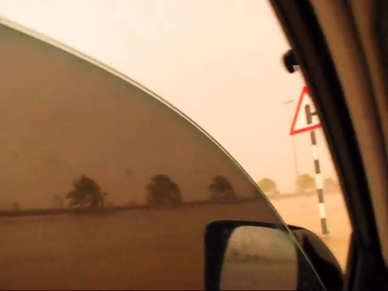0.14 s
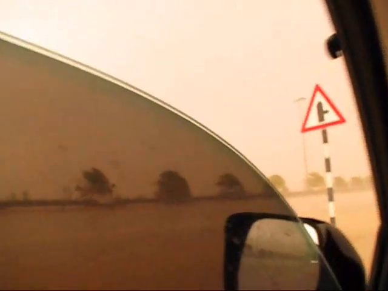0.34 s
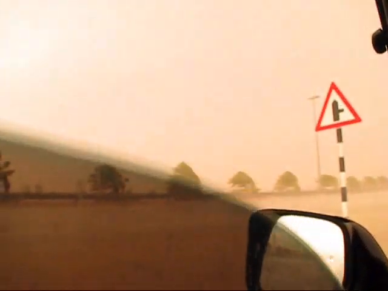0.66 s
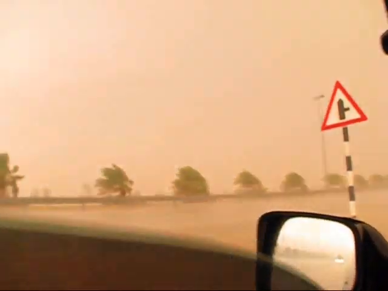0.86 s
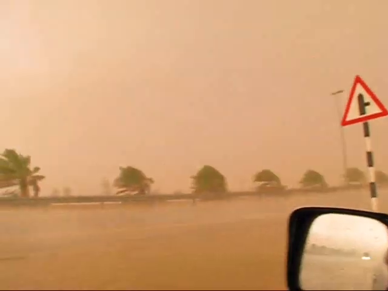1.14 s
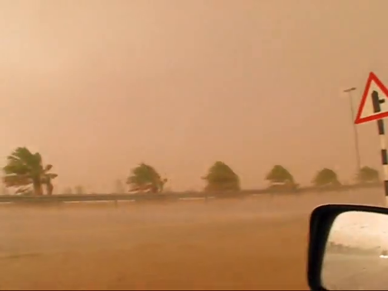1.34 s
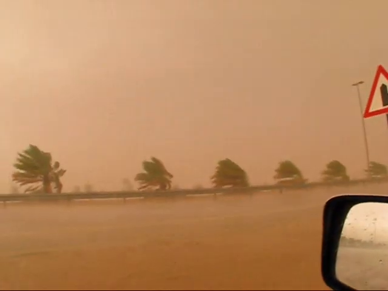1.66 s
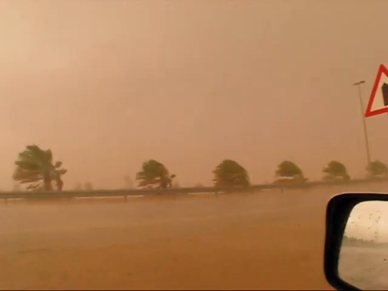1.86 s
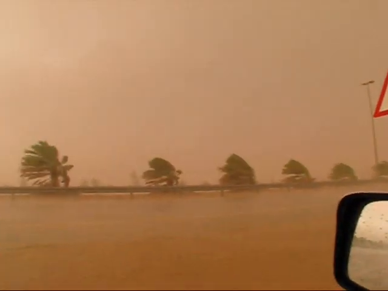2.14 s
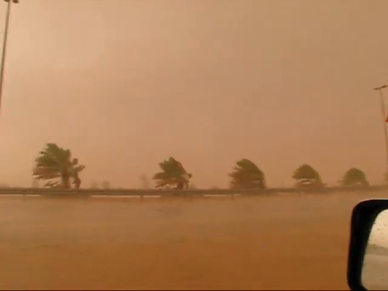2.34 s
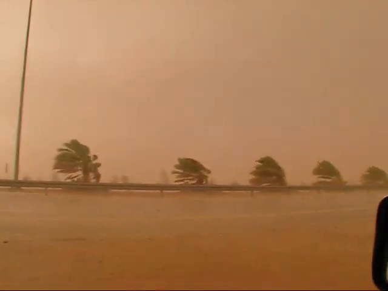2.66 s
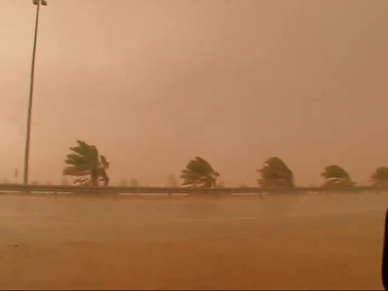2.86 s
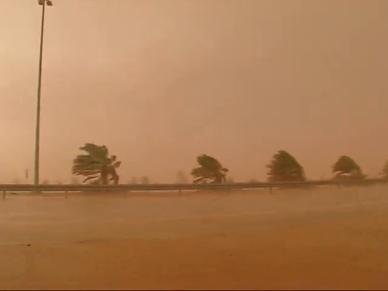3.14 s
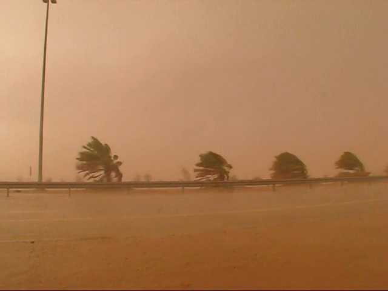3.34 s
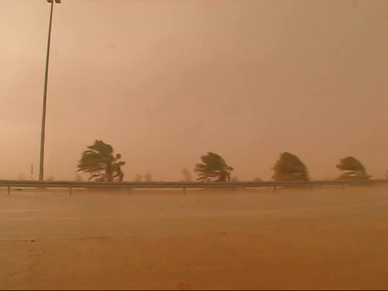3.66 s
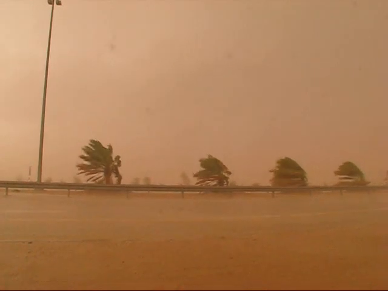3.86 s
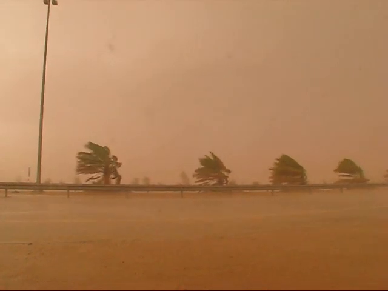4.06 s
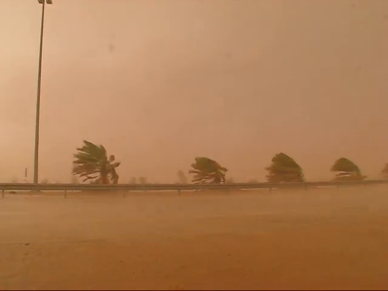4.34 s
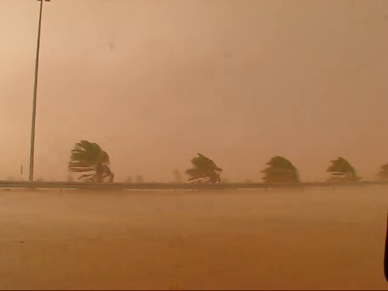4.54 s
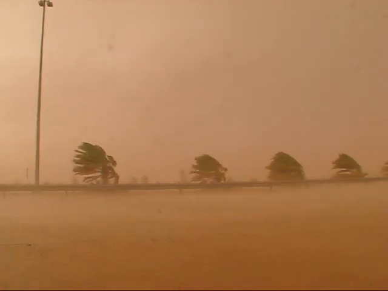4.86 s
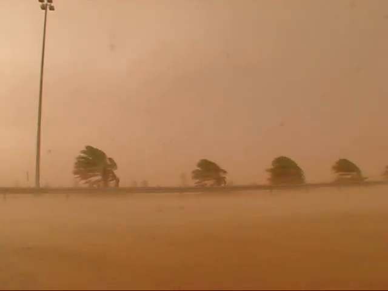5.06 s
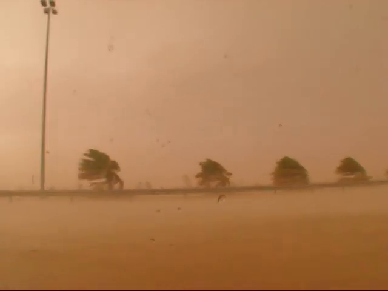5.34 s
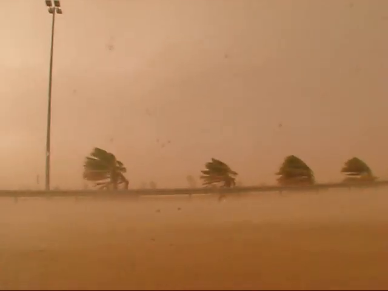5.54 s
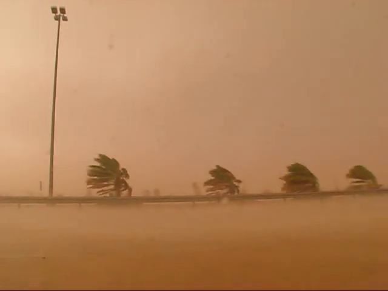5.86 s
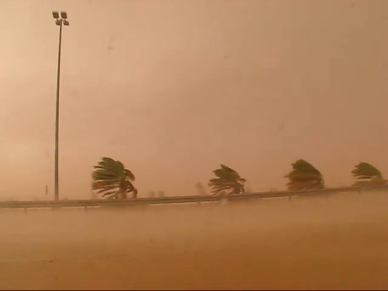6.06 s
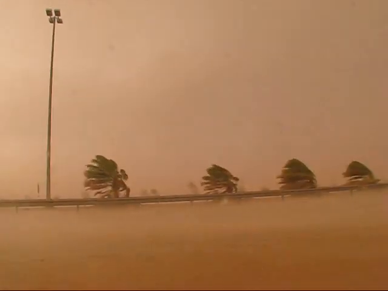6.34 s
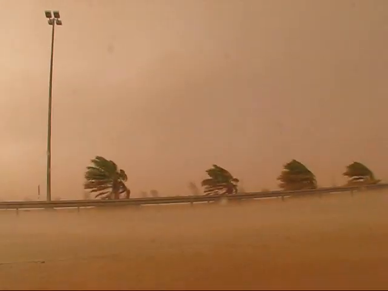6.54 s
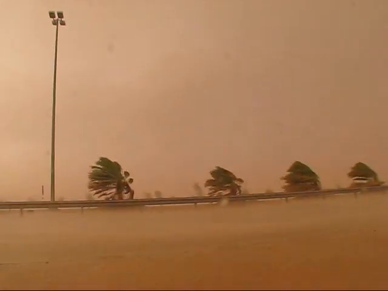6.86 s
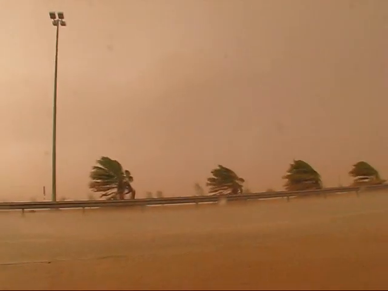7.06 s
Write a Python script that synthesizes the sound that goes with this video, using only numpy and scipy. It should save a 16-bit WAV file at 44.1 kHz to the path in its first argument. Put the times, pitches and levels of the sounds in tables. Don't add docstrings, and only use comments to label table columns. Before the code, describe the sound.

A dense storm rush of rain and roaring wind, heard from inside a car, with bassy wind buffets and sharp close drop ticks.

```python
import sys
import numpy as np
from scipy import signal
from scipy.fft import rfft, irfft, next_fast_len
from scipy.io import wavfile
from scipy.ndimage import uniform_filter1d, map_coordinates

SR = 44100
rng = np.random.default_rng(int(sys.argv[2]) if len(sys.argv) > 2 else 0)


def level_to_linear(level):
    exponent = np.asarray(level, float) / 20
    return 10 ** exponent


def output_pcm(signal):
    pcm = np.clip(np.atleast_2d(signal).T, -1, 1) * 32767
    wavfile.write(sys.argv[1], SR, np.round(pcm).astype(np.int16))


N = 317520
T = np.arange(N) / SR

# time_s, rain_db, wind_over_rain_db
STORM = [(0.0, -25.5, -9), (0.2, -27, -4.5), (0.45, -25, -5), (0.8, -25, -4.5), (1.2, -19.5, -5.5),
         (1.6, -20.5, -4.5), (2.2, -20, -4), (2.9, -19.5, -4.5), (3.25, -24.5, -4), (3.6, -22.5, -4),
         (3.8, -23.5, -4.5), (4.8, -21, -5), (5.05, -22, -4.5), (5.6, -24.5, -4.5), (5.85, -22, -5.5),
         (6.2, -24, -2), (6.6, -30.5, -3), (7.2, -29.5, -2.5)]
# pitch_hz, density_db
RUMBLE_SPECTRUM = [(15, -34), (25, -2), (60, -4.5), (110, -4.5), (155, 0.5), (210, -5), (270, -4),
                   (400, -4.5), (560, -16.5)]
ROAR_SPECTRUM = [(300, -26), (450, -0.5), (650, 0), (1000, -2.5), (1400, -4), (2200, -20)]
RUSH_SPECTRUM = [(1000, -12), (1600, 0), (2500, -.5), (4300, -2.5), (6000, -7), (9000, -19)]
FIZZ_SPECTRUM = [(4500, -8), (7000, -1), (9500, -2.5), (12000, -3.5), (15400, -9)]
# pitch_hz, likeness_0_to_1
PORT_LIKENESS = [(30, 1), (80, 0.73), (160, 0.99), (730, 0.88), (1200, 0.69), (2000, 0.37), (3300, 0.16),
                 (6000, 0.032)]
# pitch_hz, left_over_right_db
PORT_LEAN = [(60, -1), (250, -1), (700, .6), (1300, 0), (2400, -2), (4300, -1), (8000, 0.5)]
# start_s, peak_db, left_over_right_db
CLOSE_DROPS = [(0.4973, -20, -1.0), (1.3493, -11, 0.5), (2.4164, -10, -0.5), (2.8938, -8, 5),
               (2.9647, -23, 0.0), (3.6516, -10.5, -0.5), (3.7189, -9.5, -1.0), (4.0347, -18, -1.0),
               (4.1081, -10, 0.0), (4.142, -17, 0.0), (4.733, -3.5, -8), (4.7865, -16, -0.5),
               (5.1906, -27, 0.0), (5.4735, -14, 0.0), (5.5104, -6, -1.0), (5.9748, -17, 0.0),
               (6.5485, -10, 0.0), (6.9706, -17, 0.0), (7.0758, -23, 0.0)]
# start_s, peak_db, left_over_right_db
DULL_KNOCKS = [
    (0.41, -10, -1.0),
    (1.689, -6, -1.5),
    (4.973, -7, 3),
    (4.985, -4, 0),
]
# first_s, last_s, left_db, right_db, corner_hz
GUSTS = [(0.612, 0.627, -19.5, -40, 208.4), (1.831, 1.841, 0, -30, 315.7), (1.86, 1.872, -8.5, -28, 332),
         (1.942, 1.964, 4.5, 1, 300.5), (1.973, 1.999, 2, 1, 342), (2.029, 2.054, -13, -5, 299.6),
         (2.099, 2.127, -13.5, -30, 248.5), (2.243, 2.26, -10, -30, 330), (3.007, 3.025, -10.5, -28, 261.4),
         (3.828, 3.853, -4.5, -7, 259.8), (4.099, 4.129, -15.5, -18, 259.8),
         (4.371, 4.409, -13.5, -28, 280.3), (4.681, 4.699, -2.5, -8.5, 519.3), (4.735, 4.76, -13, -30, 320),
         (4.927, 4.936, 1, -12, 380.3), (4.953, 4.965, 1, -6, 311.7), (4.973, 4.998, 0, -.5, 470),
         (5.02, 5.056, -9.5, -17, 334), (5.192, 5.199, -11.5, -30, 320), (5.631, 5.644, -7.5, -28, 219.7),
         (5.843, 5.869, -3.5, -9.5, 379.7), (6.376, 6.405, -21, -33, 220), (6.411, 6.45, -6, -13.5, 400),
         (6.736, 6.76, -11, -16.5, 269.6)]
# start_s, left_db, right_db, corner_hz
PUFFS = [(0.055, -24, -27, 170), (0.22, -26, -26, 170), (3.016, -6, -35, 360), (5.205, -1, -35, 360.2),
         (5.615, 0.5, -35, 260), (5.88, -1, -35, 260.2), (2.012, -2.5, -14, 230),
         (1.425, -10.5, -35, 290.3), (1.759, -9, -35, 291.2), (1.885, 2, -3, 298),
         (2.563, -7.5, -35, 262.8), (3.216, -12.5, -38, 340), (3.88, -13, -12, 400),
         (3.905, -30, -13, 320.4), (3.918, -30, -13, 439.7), (3.99, -8.5, -35, 480.7),
         (4.893, -5.5, -23, 290), (5.158, -16, -18, 350), (5.228, -30, -14, 340.2),
         (5.562, -14, -33, 319.6), (5.785, -12, -11, 249.9), (5.988, -11, -35, 160.2),
         (6.159, -14, -35, 180.4), (6.265, -13, -35, 301), (6.513, -11, -35, 380), (6.708, -19, -35, 340),
         (6.816, -35, -18, 179.8), (6.841, -15, -35, 330), (7.115, -15, -20, 170), (7.151, -18.5, -33, 190)]
# start_s, drop_db
GAIN_DUCKS = [(1.775, 1), (1.8, -1.5), (1.821, 3.5), (1.837, 7.5), (1.89, 1), (1.952, 2), (1.985, 6),
              (2.96, 1.5), (3.025, 2), (3.84, 8), (4.686, 8), (4.703, 3.5), (4.92, 3), (4.986, 6),
              (5.62, 2.5), (5.853, 5), (6.422, 5), (6.76, 3.5)]
# from_s, to_s, share_0_to_1
WIDE_SPELLS = [(0.023, 0.064, 0.5), (0.308, 0.789, 1.0), (0.952, 1.161, 1.0), (1.503, 1.579, 1.0),
               (1.788, 1.956, 1.0), (2.148, 2.165, 0.5), (2.258, 2.305, 0.5), (2.885, 2.908, 0.5),
               (3.617, 3.651, 0.5), (3.715, 3.738, 0.5), (4.516, 4.54, 0.5), (4.905, 5.004, 1.0),
               (5.114, 5.23, 1.0), (5.503, 5.619, 1.0), (5.834, 5.898, 1.0), (6.264, 6.298, 0.5),
               (6.339, 6.449, 1.0), (6.525, 6.571, 0.5), (6.716, 6.943, 1.0), (7.175, 7.204, 0.5)]
# from_s, to_s
BRIGHT_SPELLS = [(0.906, 0.981), (1.173, 1.89), (2.572, 2.902), (3.27, 3.663), (4.197, 4.69),
                 (5.265, 5.521), (6.101, 6.269)]

GLASS_MOVES_S, GLASS_DOWN_S, GLASS_MUFFLES_DB = 0.38, 1.15, 3
FIZZ_DB, RUMBLE_DB = -5.5, -1.2
CABIN_BOOM = 0.25
HEAVE_DB, HEAVE_S = 3.5, 0.15
WHISTLE_FROM_S, WHISTLE_TO_S, WHISTLE_EDGE_S, WHISTLE_DB = 3.27, 3.75, 0.04, -37
EDDY_GAP_S, EDDY_S = 0.0095, 0.0062
EDDY_SCATTER_DB, CORNER_SCATTER = 2.5, 0.27
RIGHT_LATE_S, RIGHT_BRIGHTER = 0.00298, 1.2
SIZZLE_DB, SIZZLE_GROWS = -21.5, 0.85


def unit(x):
    return x / np.sqrt(np.mean(x ** 2) + 1e-20)


def along(points, hz):
    f, v = np.transpose(points)
    return np.interp(np.log(hz + 1), np.log(f + 1), v, left=v[0], right=v[-1])


def wobble(rate):
    knots = rng.standard_normal(int(N * rate / SR) + 4)
    return map_coordinates(knots, [T * rate])


def filtered(x, response):
    m = next_fast_len(N + 8192)
    return irfft(rfft(x, m) * response(np.fft.rfftfreq(m, 1 / SR)), m)[..., :N]


def during(spans, t):
    return sum((t > a) & (t < b) for a, b in spans) > 0


def noise(spectrum, patchy_db):
    z = signal.stft(rng.standard_normal((2, N)), nperseg=512)[2]
    field = uniform_filter1d(rng.standard_normal(z.shape[1:]), size=6, axis=0)
    field = uniform_filter1d(field, size=8, axis=1)
    pair = signal.istft(z * level_to_linear(patchy_db * unit(field)), nperseg=512)[1][:, :N]
    closed = [(spectrum[0][0] * .7, -120)] + spectrum + [(spectrum[-1][0] * 1.3, -120)]

    def mid_side(hz):
        turn = np.arccos(np.clip(along(PORT_LIKENESS, hz), -1, 1)) / 2
        return level_to_linear(along(closed, hz)) * [np.cos(turn), np.sin(turn)]

    mid, side = filtered(pair, mid_side)
    ports = np.array([mid + side, mid - side])
    return unit(filtered(ports, lambda hz: level_to_linear(along(PORT_LEAN, hz) * [[.5], [-.5]])))


def bursts(s, db, length, colour, rise, jolts):
    t = np.arange(-1024, 3072) / SR
    rising = (t / (rise * length[:, None])) ** 2
    falling = (t / length[:, None]) ** 1.5
    shape = np.exp(-np.where(t < 0, rising, falling))
    chance, size, flip = np.moveaxis(rng.random(shape.shape + (3,)), -1, 0)
    hit = (chance < jolts / SR) | (t == 0)
    sign = (-1.) ** np.cumsum(hit & (flip < .72), axis=1)
    between = 0.15 * (flip - .5)
    kicks = (hit * sign * (0.41 + size) + between) * shape
    raw = irfft(rfft(kicks) * colour(np.fft.rfftfreq(len(t), 1 / SR)), len(t))
    loudness = np.sqrt(np.sum(raw ** 2, 1) / np.sum(shape ** 2, 1))
    raw *= (level_to_linear(db) / loudness)[:, None]
    at = np.round(s * SR).astype(int)[:, None] + np.arange(len(t))
    return np.bincount(at.ravel(), raw.ravel(), N + 8192)[1024:N + 1024]


def storm():
    s, rain, wind = np.transpose(STORM)
    rain_db, wind_db = np.interp(T, s, rain), np.interp(T, s, wind)
    glass_db = np.interp(T, [GLASS_MOVES_S, GLASS_DOWN_S], [-GLASS_MUFFLES_DB, 0])
    coarse = T[::64]
    push = sum(level_to_linear(left_db / 2) * np.exp(-((coarse - start) / HEAVE_S) ** 2)
               for start, _, left_db, *_ in GUSTS)
    heave_db = np.interp(T, coarse, HEAVE_DB * np.tanh(push))
    flurry_db = 0.57 * wobble(6.6) + 0.26 * wobble(27)
    lumps_db = 0.57 * np.array([wobble(30), wobble(30)]) + [[1.], [-1.]]
    rumble_db = wind_db + RUMBLE_DB - CABIN_BOOM * glass_db + heave_db + lumps_db
    fizz_db = FIZZ_DB + glass_db + 0.42 * wobble(66) + 0.78 * wobble(400)
    rumble = level_to_linear(rumble_db) * noise(RUMBLE_SPECTRUM, patchy_db=1.0)
    roar = level_to_linear(wind_db + .5 + 0.65 * wobble(15)) * noise(ROAR_SPECTRUM, patchy_db=0.25)
    rush = level_to_linear(0.53 + 0.053 * wobble(12)) * noise(RUSH_SPECTRUM, patchy_db=0.3)
    fizz = level_to_linear(fizz_db) * noise(FIZZ_SPECTRUM, patchy_db=0.06)
    return level_to_linear(rain_db + flurry_db) * (rumble + roar + rush + fizz)


def whistle():
    gate = np.clip(np.minimum(T - WHISTLE_FROM_S, WHISTLE_TO_S - T) / WHISTLE_EDGE_S, 0, 1)
    tone = np.sqrt(2) * np.sin(2 * np.pi * 1060 * T + 1.1 * wobble(22))
    return gate * level_to_linear(WHISTLE_DB + 2 * wobble(18)) * tone


def drops(table, hz, length, width):
    s, db, pan_db = np.transpose(table)
    colour = lambda f: np.exp(-(np.log((f + 1) / hz) / width) ** 2)
    ticks = bursts(s + .0006, db - 7.5, length + 0 * s, colour, rise=0.12, jolts=15000)
    return ticks * level_to_linear(np.interp(T, s, pan_db) * [[.5], [-.5]])


def spatter(count):
    when, size, side = rng.random((count, 3)).T
    s = np.sort(when) * (N / SR - .1)
    storm_db = np.interp(s, *np.transpose(STORM)[:2])
    peak_db = storm_db - 0.5 - 1.4 * np.log(size + .08)
    return drops(np.transpose([s, peak_db, 4 * side - 2]), 8600, 0.0018, 0.57)


def close_rain():
    ticks = drops(CLOSE_DROPS, 7896, 0.0025, 0.92)
    knocks = drops(DULL_KNOCKS, 1700, 0.003, 1.1)
    return ticks + knocks + spatter(count=90)


def shedding():
    trains = []
    for first, last, *rest in GUSTS:
        count = round((last - first) / EDDY_GAP_S) + 1
        trains += [(s, *rest) for s in np.linspace(first, last, count)]
    return np.array(trains + PUFFS)


def eddies(s, db, corner_hz):
    late, size, long, pitch, sharp = rng.standard_normal((len(s), 5)).T
    db = db + EDDY_SCATTER_DB * size
    corner = (corner_hz * np.exp(CORNER_SCATTER * pitch))[:, None]
    sizzle_db = np.clip(SIZZLE_DB + SIZZLE_GROWS * db + 3 * sharp, -40, -8)
    sizzle = level_to_linear(sizzle_db[:, None] - 2.5) * np.sqrt(corner / 300)

    def colour(f):
        thump = f / (f + 70) / (1 + (f / (1.06 * corner)) ** 3) ** 0.88
        edge = f ** 2 / (f ** 2 + 800 ** 2) / (1 + (f / 2000) ** 2) ** 1.38
        return thump + sizzle * edge

    length = EDDY_S * np.exp(0.22 * long)
    return bursts(s + 0.001205 * late, db - .5, length, colour, rise=0.61, jolts=1.7 * corner)


def wind_on_ports():
    s, left_db, right_db, corner_hz = shedding().T
    left = eddies(s, left_db, corner_hz)
    right = eddies(s + RIGHT_LATE_S, right_db, RIGHT_BRIGHTER * corner_hz)
    return np.array([left - 0.019 * right, right - 0.01 * left])


def scene():
    return storm() + whistle() + close_rain() + wind_on_ports()


def ducking(recover_db):
    cut, left, before = np.zeros(N), 0, 0
    for s, db in GAIN_DUCKS:
        left = max(0, left - recover_db * (s - before)) + db
        before = s
        cut = np.where(T >= s, np.maximum(0, left - recover_db * (T - s)), cut)
    return -uniform_filter1d(cut, size=450)


def thinned(x):
    hz, t, z = signal.stft(x, SR, nperseg=2048)
    hz = hz[:, None]
    cells = rng.standard_normal((len(hz) // 14 + 1, len(t)))
    cells = unit(uniform_filter1d(cells, size=3, axis=1))
    share = sum(part * during([(a, b)], t) for a, b, part in WIDE_SPELLS)
    patches = np.repeat(cells > 1.7 - np.tan(1.5 * share) * 1.9, 14, axis=0)[:len(hz)]
    stereo = (hz < 4050) | patches & (hz < 13300 + 2000 * share)
    z = np.where(stereo, z, 1.35 * z.mean(0))
    ragged = unit(uniform_filter1d(rng.standard_normal(len(t)), size=5))
    edge_hz = np.where(during(BRIGHT_SPELLS, t), 15080 + 30 * ragged, 13350 + 100 * ragged)
    return signal.istft(z * (hz < edge_hz), SR, nperseg=2048)[1][:, :N]


def band_limit(x):
    return signal.sosfilt(signal.butter(12, 15360, fs=SR, output="sos"), x)


def record(dry):
    held = np.clip(dry * level_to_linear(ducking(recover_db=16)), -.98, .98)
    mix = np.clip(thinned(held), -1, 1)
    return band_limit(mix)


dry = scene()
out = record(dry)
output_pcm(out)
```